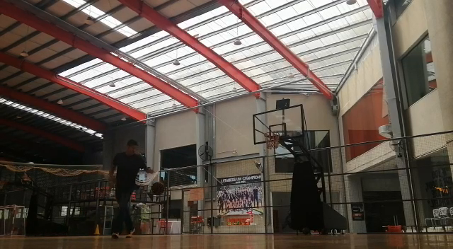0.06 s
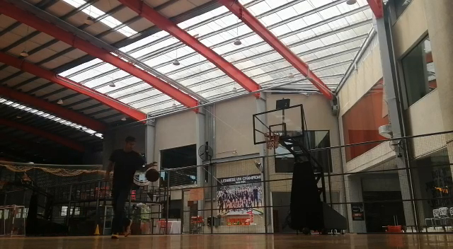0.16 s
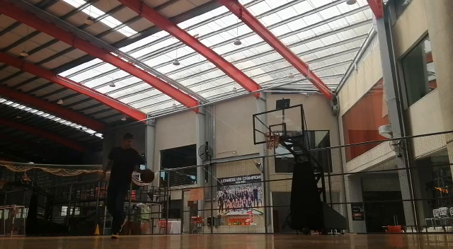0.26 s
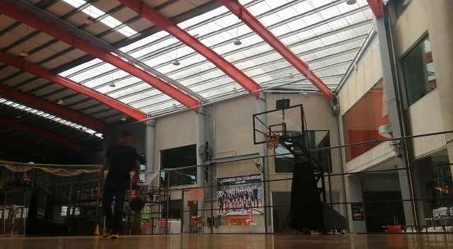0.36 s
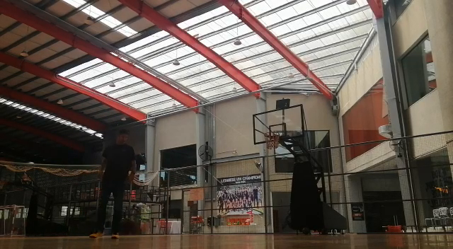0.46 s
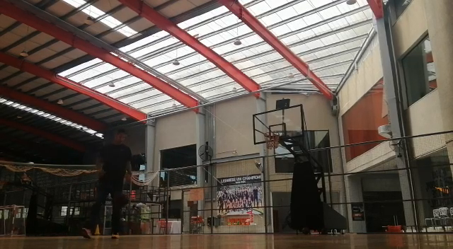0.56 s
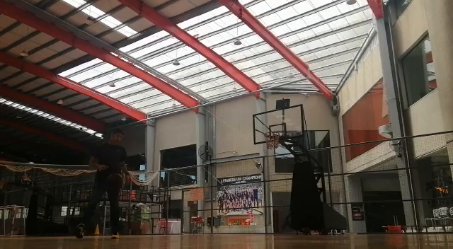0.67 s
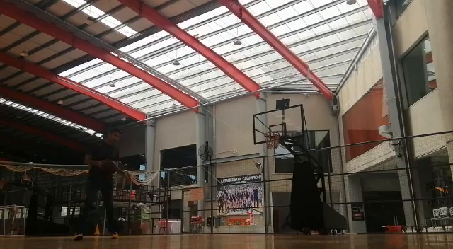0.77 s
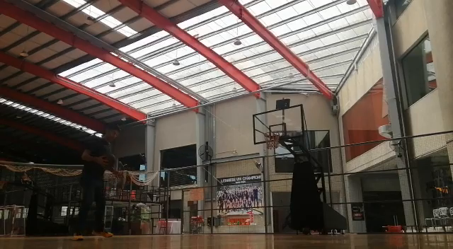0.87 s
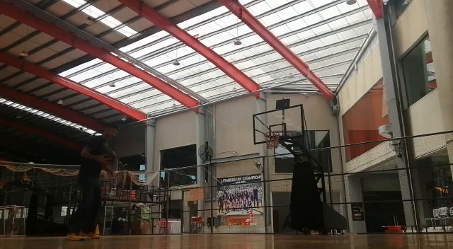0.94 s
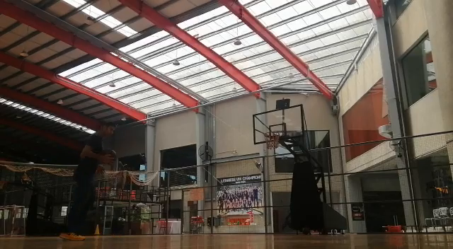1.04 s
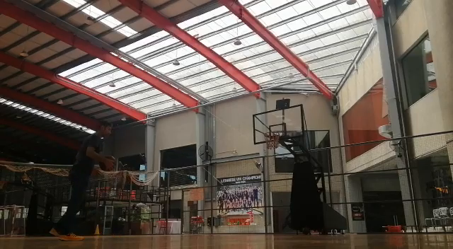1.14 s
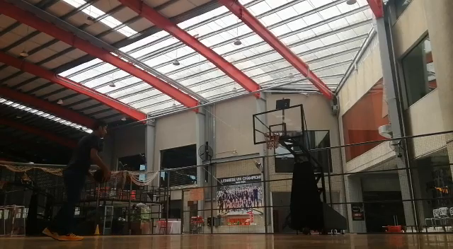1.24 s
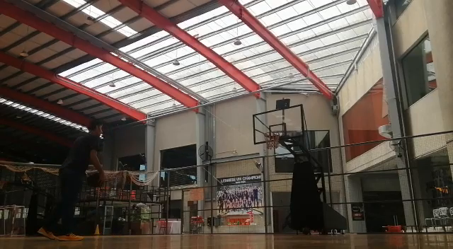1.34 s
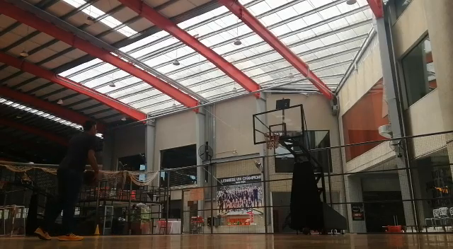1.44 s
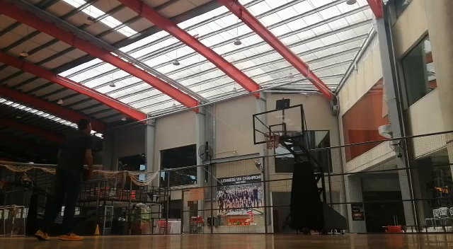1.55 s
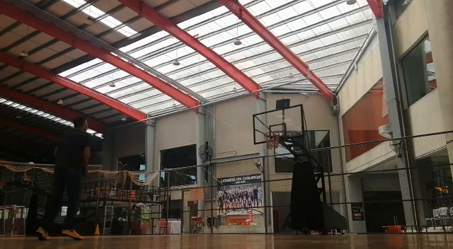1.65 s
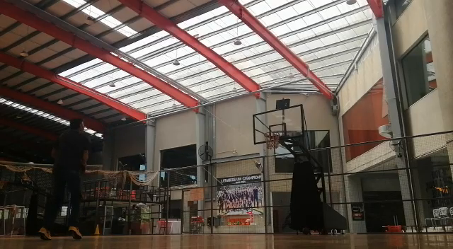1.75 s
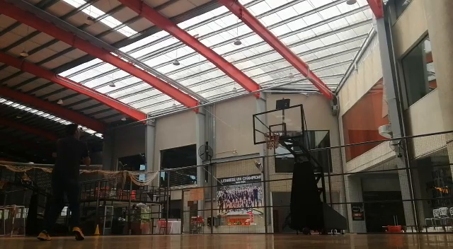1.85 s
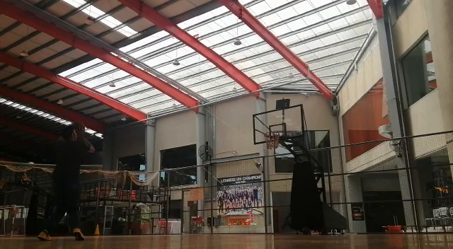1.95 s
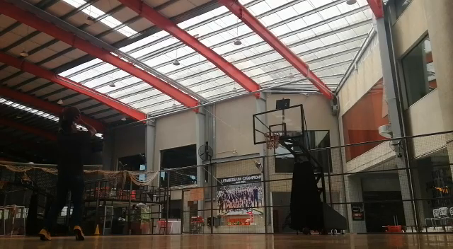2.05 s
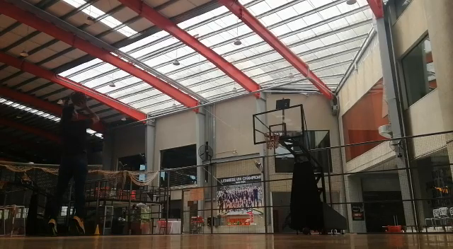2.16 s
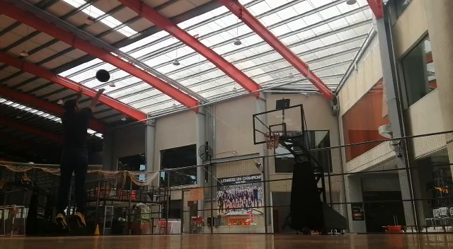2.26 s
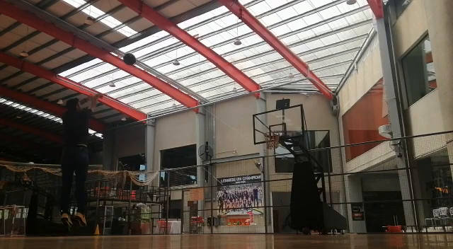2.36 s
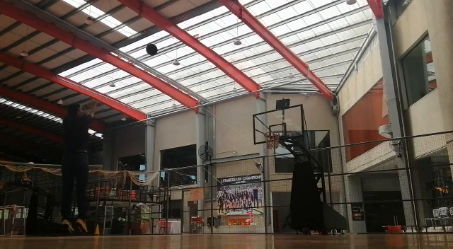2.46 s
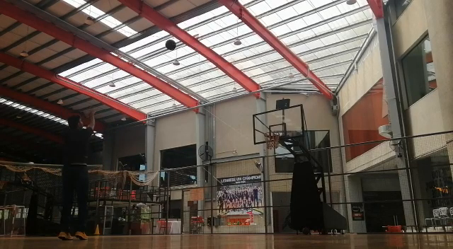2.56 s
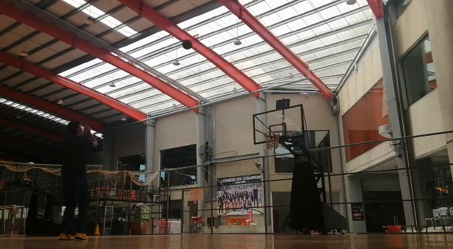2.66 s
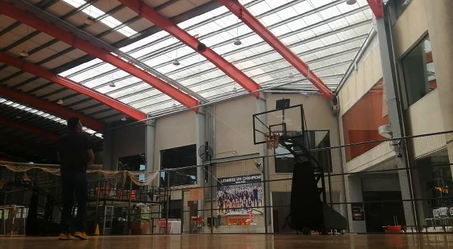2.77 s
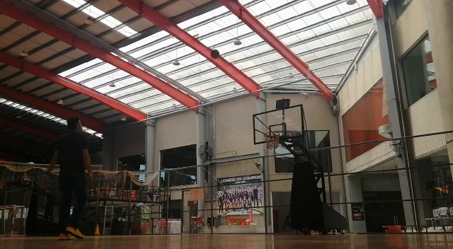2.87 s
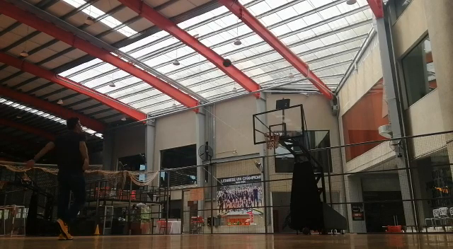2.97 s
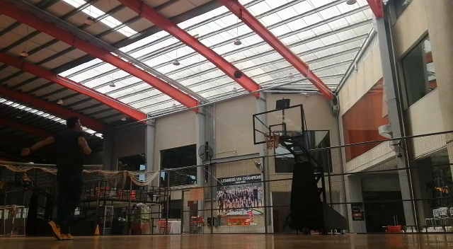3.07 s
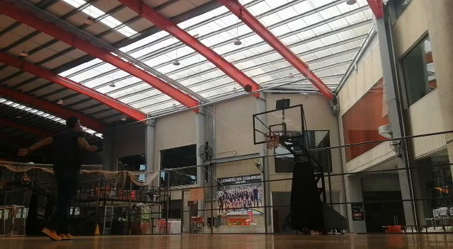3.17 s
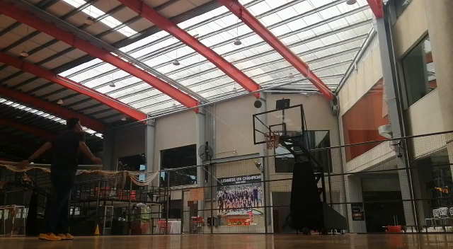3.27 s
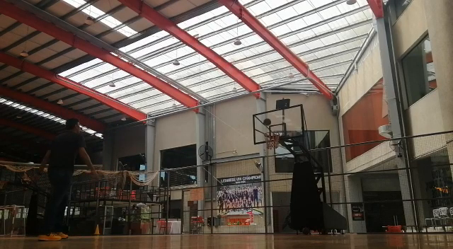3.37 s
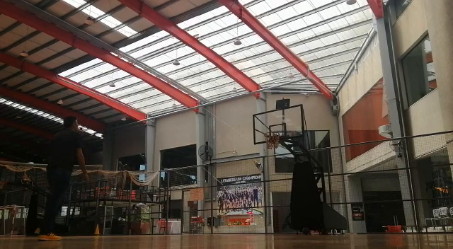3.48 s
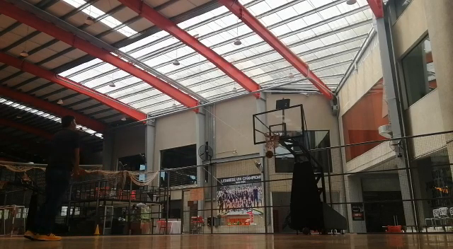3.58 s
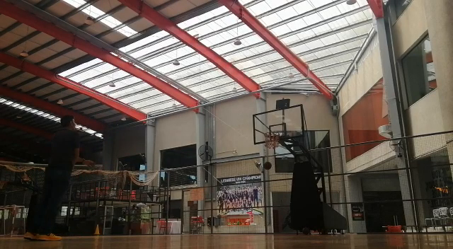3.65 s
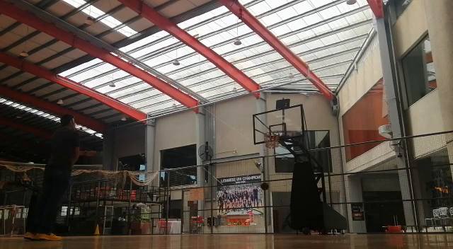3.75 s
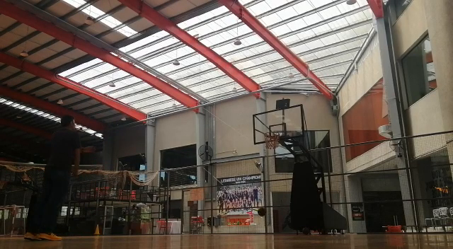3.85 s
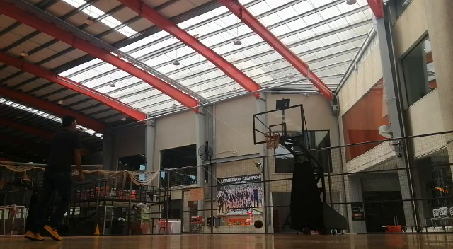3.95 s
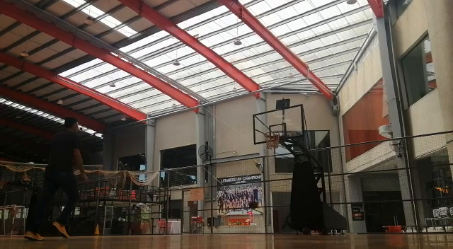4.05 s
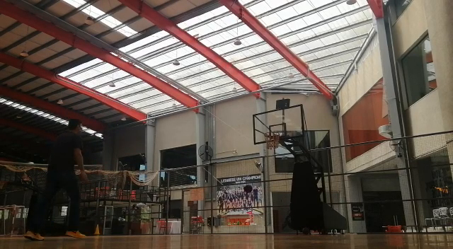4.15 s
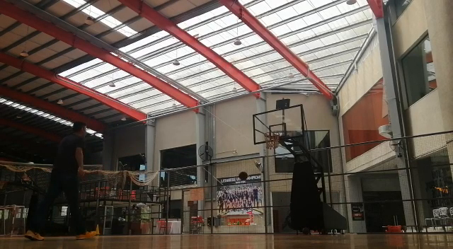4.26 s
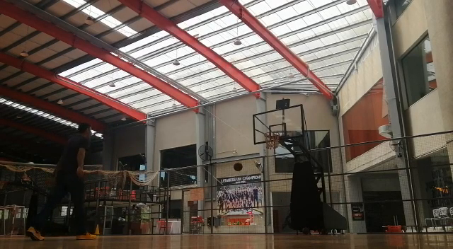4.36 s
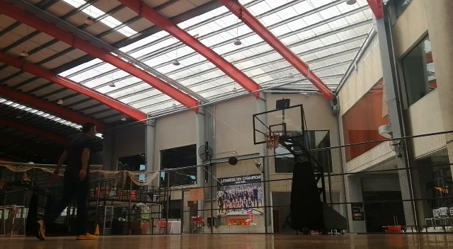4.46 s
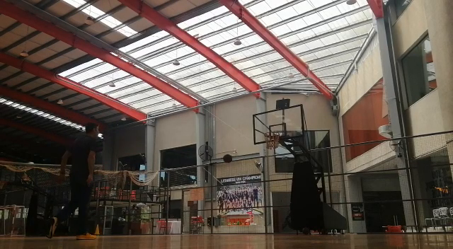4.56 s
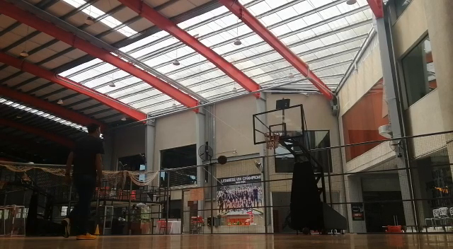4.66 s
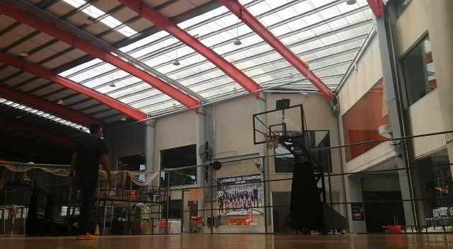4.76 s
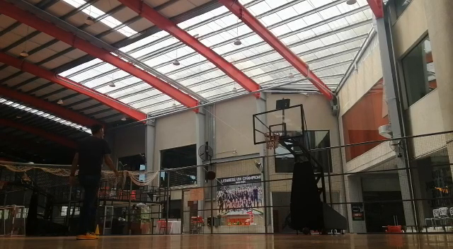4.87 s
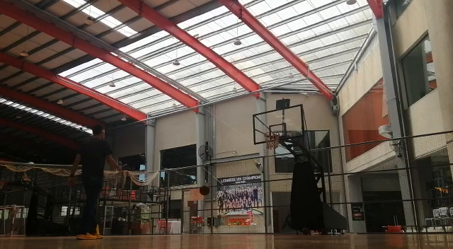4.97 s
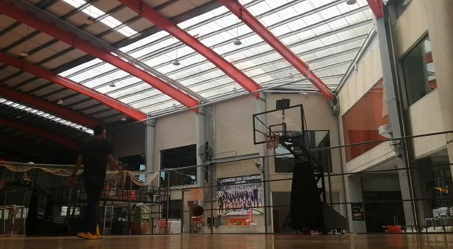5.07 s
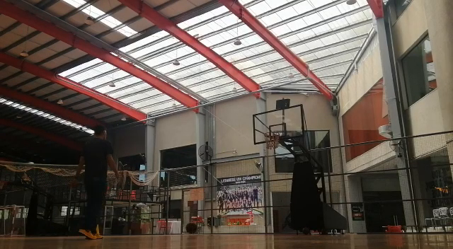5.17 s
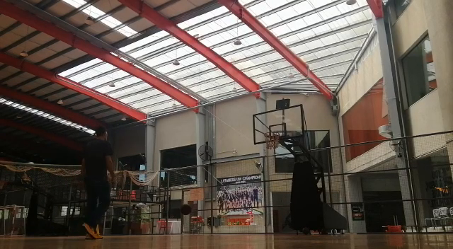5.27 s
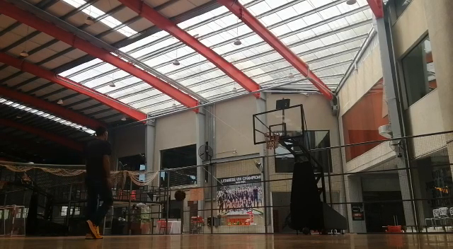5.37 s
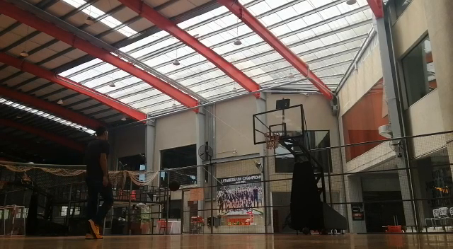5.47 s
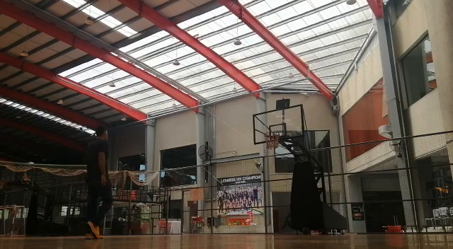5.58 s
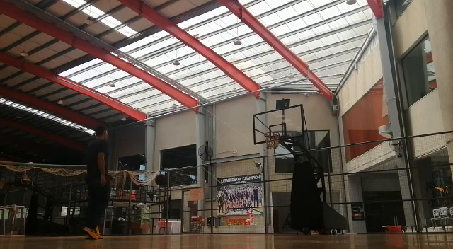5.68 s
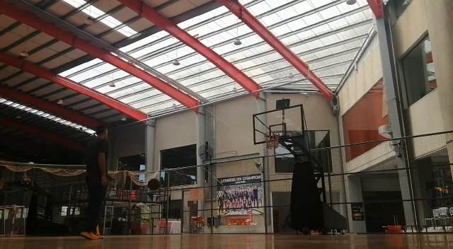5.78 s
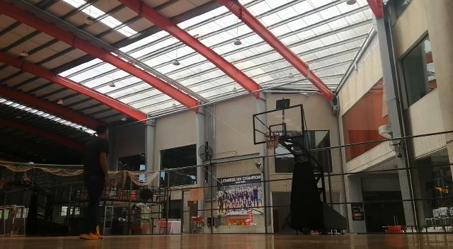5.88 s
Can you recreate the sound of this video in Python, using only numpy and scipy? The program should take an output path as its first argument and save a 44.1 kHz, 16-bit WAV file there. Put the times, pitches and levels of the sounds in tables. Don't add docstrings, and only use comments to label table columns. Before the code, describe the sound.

Two booming dribbles, a brief sole squeak and shuffling steps, then a ball clips hoop and net and bounces on in a reverberant gym.

```python
import sys
import numpy as np
from scipy import signal
from scipy.fft import rfft, irfft, next_fast_len
from scipy.io import wavfile
from scipy.ndimage import uniform_filter1d

SR = 44100
rng = np.random.default_rng(int(sys.argv[2]) if len(sys.argv) > 2 else 0)


def gain_from_db(level_db):
    decades = np.asarray(level_db, float) / 20
    return 10 ** decades


def waveform_to_disk(signal):
    frames = np.transpose(np.atleast_2d(signal))
    scaled = np.clip(frames, -1, 1) * 32767
    samples = np.round(scaled).astype(np.int16)
    wavfile.write(sys.argv[1], SR, samples)


N = 261072


def at_hz(points, hz, axis=1):
    points = np.array(points)
    return np.interp(np.log(np.maximum(hz, 1)), np.log(points[:, 0]), points[:, axis])


def add(track, s, sound):
    i = int(round(s * SR))
    track[i:i + len(sound)] += sound[:max(N - i, 0)]


def band(x, low_hz, high_hz):
    return signal.sosfilt(signal.butter(2, [low_hz, high_hz], "band", fs=SR, output="sos"), x)


def filtered(x, response):
    size = next_fast_len(N + 4096)
    hz = np.arange(size // 2 + 1) * SR / size
    return irfft(rfft(x, size) * response(hz), size)[:, :N]


def struck(modes, spread_db, size=8192):
    t = np.arange(size) / SR
    ringing = np.zeros(size)
    for hz, db, t60 in modes:
        level_db = db + spread_db * rng.standard_normal()
        ringing += gain_from_db(level_db - 60 * t / t60) * np.sin(2 * np.pi * hz * t)
    return ringing


def noise_bands(size):
    # f/Hz, likeness [0 to 1]
    likeness = [(60, 0.99), (200, 1), (500, 0.5), (1000, 0.061), (4000, 0.019), (12000, 0.05)]
    edges = 20 * 2 ** np.arange(0, 9.9, .5)
    white = rng.standard_normal((2, 2, size + 8192))
    for k, (low, high) in enumerate(zip(edges, edges[1:])):
        mid, side = band(white[k % 2], low, high)[:, 8192:]
        hz = np.sqrt(low * high)
        alike = np.clip(at_hz(likeness, hz), 0, 1)
        yield hz, (np.sqrt(1 + alike) * mid + np.sqrt(1 - alike) * side * [[1], [-1]]) / np.sqrt(2)


def rumble():
    # f/Hz, level/dB per Hz
    spectrum = [(25, -1), (40, -24), (62, -1), (82, -3), (120, -2), (200, -9), (310, -22.5), (500, -26.5),
                (1000, -27.5), (2000, -33), (4000, -41), (6300, -45.5), (9000, -59.5), (15000, -56.5)]
    # t/s, level/dB
    traffic = [(0.0, -32), (0.45, -48), (0.82, -37.5), (1.75, -44.5), (2.14, -42.5), (3.3, -45),
               (4.5, -37.5), (5.47, -41), (5.92, -38)]
    traffic_db = np.interp(np.arange(N) / SR, *np.transpose(traffic))
    swell_db = traffic_db - np.mean(traffic_db)
    out = 0
    for hz, noise in noise_bands(N):
        flicker_db = 1.2 * np.interp(np.arange(N), np.linspace(0, N, 40), rng.standard_normal(40))
        share = 1 / (1 + (hz / 260.0) ** 2)
        out = out + noise * gain_from_db(at_hz(spectrum, hz) + share * swell_db + flicker_db)
    return gain_from_db(-47) * out / np.std(out)


def lamp_whine():
    return gain_from_db(-103) * np.sin(2 * np.pi * 12930 * np.arange(N) / SR)


def hall(send):
    # f/Hz, level/dB, extra slope/dB per s, build-up/s
    colour = [(40, -13, 1.5, 0.022), (106.8, -1.5, 3.7, 0.025), (306, -1.5, -12.5, 0.054),
              (1080, -2.5, -3.5, 0.011), (3700, -5, 0, 0.087), (6100, -6, -14, 0.048),
              (10100, -3, -43, 0.2), (15500, -8, -59, .03)]
    t = np.arange(int(2.5 * SR)) / SR
    shape_db = -33.5 - 21.5 * t
    shape_db += 7 * np.exp(-t / 0.03)
    shape_db += 3 / (1 + np.exp((t - 0.49) / 0.032))
    shape_db -= 6.0 * np.exp(-((t - 0.046) / 0.01) ** 2)
    bunches = np.interp(t, np.linspace(0, t[-1], 300), rng.standard_normal(300))
    shape_db += 5.7 * bunches * np.exp(-t / 0.15)
    shape_db += 20 * np.log10(np.clip(t / .003, 1e-3, 1))
    tail = 0
    for hz, noise in noise_bands(len(t)):
        level_db, slope_db, build_s = (at_hz(colour, hz, axis=k) for k in (1, 2, 3))
        build_up = 1 - np.exp(-t / max(build_s, 1e-4))
        tail = tail + noise * gain_from_db(shape_db + level_db + slope_db * t) * build_up
    return signal.fftconvolve(send[None], tail)[:, :N]


def returns(distance_m):
    # across/m, further back/m, slap level/dB, boom level/dB, sustained level/dB
    images = [
        (13.82, 0, 1.5, 1, 4.5),
        (28, 0, -6, 7.5, 8),
        (0, 22.5, -17, -2, 0),
        (0, 41, -7, 7.5, 5.5),
        (0, 86.5, -10, 4, 0),
        (0, 114, -34, 7, 4.5),
    ]
    for across_m, back_m, *part_db in images:
        path_m = np.hypot(distance_m + back_m, across_m)
        delay_s = (path_m - distance_m) / 343
        yield delay_s, np.array(part_db) + 20 * np.log10(distance_m / path_m)


def step(scuff_db, low_hz, high_hz, thud_db, t60):
    t = np.arange(8192) / SR
    gain = gain_from_db(scuff_db + 7.0) * np.sqrt(SR / 2 / (high_hz - low_hz))
    grit = rng.standard_normal(8192) * gain_from_db(-60 * t / t60) * (1 - np.exp(-t / 0.0013))
    thud = gain_from_db(thud_db) * np.sin(2 * np.pi * 69.3 * t) * gain_from_db(-60 * t / 0.21) * (1 - np.exp(-t / 0.013))
    knock = (t == 0) * np.sqrt(np.sum(grit ** 2))
    scuff = band(band(grit, low_hz, high_hz), low_hz, high_hz)
    return gain * scuff + thud, gain * band(knock, low_hz, high_hz) + thud


def sole(scuff_db, bright_db, thud_db, t60):
    # low f/Hz, high f/Hz, share of the brightness, level/dB
    sole_parts = [
        (297, 577, 0.029, -1),
        (676, 1720, 0.12, -3),
        (1880, 5770, 0.94, -0.5),
        (6500, 12000, 0.8, -13),
    ]
    part_thud_db = thud_db - 20 * np.log10(len(sole_parts))
    parts = []
    for low_hz, high_hz, share, part_db in sole_parts:
        part_scuff_db = scuff_db + share * bright_db + part_db
        parts.append(step(part_scuff_db, low_hz, high_hz, part_thud_db, t60 / 1.52 ** share))
    return np.sum(parts, axis=0)


def squeak():
    # t/s, hold/s, f/Hz, level/dB, overtone level/dB
    slips = [
        (1.058, 0.01, 4147, -38, -33.5),
        (1.117, 0.035, 4346, -32.5, 7.5),
        (1.466, .006, 5630, -62, -27),
    ]
    # multiple of the pitch, level/dB
    orders = [
        (2, -21.5),
        (3, -40),
    ]
    attack_s, release_db_per_s, sag_hz_per_s, overtone_fade_db_per_s = .012, 1803, 2500, 298
    firm_slip_db, light_chatter = -33, .4
    wobble = uniform_filter1d(rng.standard_normal(N), size=150) * 0.018
    t = np.arange(4096) / SR
    out = np.zeros(N)
    for s, hold_s, hz, db, over_db in slips:
        chatter = wobble[int(s * SR):][:4096] * gain_from_db(light_chatter * (firm_slip_db - db))
        phase = 2 * np.pi * np.cumsum((hz - sag_hz_per_s * t) * (1 + chatter)) / SR
        release_db = release_db_per_s * np.maximum(t - attack_s - hold_s, 0)
        level = np.minimum(t / attack_s, 1) ** 2 * gain_from_db(db - release_db) * np.sqrt(2)
        overtones = sum(gain_from_db(order_db) * np.sin(k * phase) for k, order_db in orders)
        add(out, s, level * (np.sin(phase) + gain_from_db(over_db - overtone_fade_db_per_s * t) * overtones))
    return out


def net():
    t = np.arange(16384) / SR
    unevenness = uniform_filter1d(rng.standard_normal(len(t)), size=100) * 10
    clatter = rng.standard_normal(len(t)) * gain_from_db(6.8 * unevenness)
    return gain_from_db(-44.0 - 60 * t / 0.77) * band(clatter, 1200, 8000)


def rim(db):
    # f/Hz, level/dB, t60/s
    hoop_modes = [(169.7, -7.5, 0.16), (246, -12.5, 0.073), (410, -0.5, 0.12), (553, -14, 0.038),
                  (1130, -4, 0.011), (1364, -24.5, 0.11), (1810, -3, 0.0057), (2800, -24, 0.037)]
    # low f/Hz, high f/Hz, level/dB
    crash_bands = [
        (57.6, 424, 42),
        (322, 1340, 33.5),
        (1710, 2560, 18.5),
        (4000, 11300, 21),
        (9900, 20600, 17.5),
    ]
    t = np.arange(600) / SR
    rattle = rng.standard_normal(600) * (t / 0.0031) * np.exp(1 - t / 0.0028)
    ring = struck(hoop_modes, spread_db=3.0)
    contact = band(np.pad(rattle, (0, 7592)), 630, 3200)
    near = np.convolve(ring, rattle * gain_from_db(-14.0))[:8192] + gain_from_db(-1.0) * contact
    click = np.arange(8192) == 0
    crash = sum(gain_from_db(part_db) * band(click, low_hz, high_hz) for low_hz, high_hz, part_db in crash_bands)
    return gain_from_db(db) * near, gain_from_db(db) * (crash + gain_from_db(-4.5) * ring)


def echo(slap_db, thump_db, ring_db, bright_hz):
    t = np.arange(8192) / SR
    scatter = rng.standard_normal(400) * gain_from_db(-23.0 - 60 * t[:400] / 0.027)
    scatter[20] = 1
    direct, _ = bounce(slap_db, -99, ring_db, bright_hz)
    slap = np.convolve(direct, scatter)[20:8212]
    boom = np.sin(2 * np.pi * 142.0 * (t - .0032)) * (t / 0.0068) * np.exp(1 - t / 0.0047)
    return slap + gain_from_db(thump_db) * boom


def bounce(slap_db, thump_db, ring_db, bright_hz):
    # f/Hz, level/dB, t60/s
    air_modes = [(479, -10, 0.032), (1266, -9, 0.036), (1433, -5, 0.0088), (1886, -9.5, 0.0065),
                 (2160, -18.5, 0.021), (3070, -16.5, 0.005), (4300, -36, 0.0073), (5790, -28.5, 0.025)]
    # f/Hz, level/dB, t60/s
    board_modes = [(112, 0, .042), (235, -8, .04), (500, -17, .03)]
    t = np.arange(8192) / SR
    click = (t == 0) * -SR / bright_hz / 3
    shock = click + .2 * np.roll(click, 30) - .3 * np.roll(click, 120)
    shock -= 0.039 * click[0] * rng.standard_normal(8192) * gain_from_db(-60 * t / 0.048)
    boards = np.roll(struck(board_modes, spread_db=3.0), 62)
    boards[:62] = -.5 * np.sin(np.pi * np.arange(62) / 62)
    body = gain_from_db(thump_db) * boards
    air = gain_from_db(ring_db) * band(struck(air_modes, spread_db=8.5), 390, 1.25 * bright_hz)
    near = gain_from_db(slap_db) * band(shock, 230, 0.76 * bright_hz) + body - air
    all_round = gain_from_db(slap_db) * band(click, 630, bright_hz) + gain_from_db(-4.0) * body - gain_from_db(2.0) * air
    return near, all_round


def scene():
    # t/s, slap level/dB, thump level/dB, inner air ring level/dB, distance/m
    bounces = [
        (.0046, -5.5, -16, -18, 11.26),
        (0.5935, -6, -16.5, -33.5, 11.5),
        (4.0857, -1.5, -17.5, -41.5, 16.9),
        (5.311, -6, -22.5, -31, 14),
    ]
    # t/s, level/dB, hall send level/dB
    rim_hits = [
        (3.612, -27.5, 2),
        (3.627, -31, -51.5),
    ]
    # t/s after the hit, level/dB
    rim_booms = [
        (0.055, -16),
        (.105, -24),
    ]
    # t/s, scuff level/dB, brightness/dB, thud level/dB, scuff t60/s
    steps = [(.359, -45, -8, -41, 0.064), (.925, -55, 0, -47, 0.064), (1.404, -47, -0.5, -32, 0.079),
             (1.848, -80, 15, -57, 0.04), (1.908, -52.5, -5.5, -30.5, 0.064), (2.131, -85, 10, -37, 0.56),
             (2.211, -74, 1, -30, .05), (2.265, -69, 10, -42, 0.061), (2.513, -68, -24, -38, 0.024),
             (2.662, -48, -13.5, -40, 0.17), (2.682, -64.5, -2.5, -38, 0.78), (3.373, -68, -21, -26.5, .02),
             (4.837, -78, 2, -37, 0.2), (4.929, -54.5, -8, -37, .025)]
    # f/Hz, level/dB
    mic_response = [(22, -4), (50, 3.5), (6000, -5.5), (8000, -8.5), (12000, -14.5), (15000, -24.5),
                    (15600, -37)]
    player_m, hall_radius_m = 10, 10.25
    slip, shoes, echoes = squeak(), np.zeros(N), np.zeros(N)
    near, send = slip.copy(), slip * gain_from_db(-3.5)

    blows = [(s, rim(db), send_db) for s, db, send_db in rim_hits]
    for s, slap_db, thump_db, ring_db, distance_m in bounces:
        send_db = 20 * np.log10(distance_m / hall_radius_m)
        blows.append((s, bounce(slap_db, thump_db, ring_db, 5200), send_db))
        for later_s, (sharp_db, boom_db, held_db) in returns(distance_m):
            returned = echo(slap_db + sharp_db, thump_db + boom_db, ring_db + held_db, 4540)
            add(echoes, s + later_s, returned)
    for s, (direct, all_round), send_db in blows:
        add(near, s, direct)
        add(send, s, all_round * gain_from_db(send_db))

    for s, *touch in steps:
        direct, all_round = sole(*touch)
        add(shoes, s, direct)
        add(send, s, all_round * gain_from_db(-1.5))
    for later_s, (_, _, held_db) in returns(player_m):
        add(echoes, later_s, gain_from_db(held_db) * (slip + gain_from_db(-0.5) * band(shoes, 250, 5000)))

    rim_s = rim_hits[0][0]
    add(echoes, rim_s, net())
    for later_s, db in rim_booms:
        add(echoes, rim_s + later_s, echo(db - 24, db, db - 12, 3000))
    echoes = np.array([gain_from_db(-8) * np.roll(echoes, int(0.00036 * SR)), echoes])
    sound = near + shoes + echoes + hall(send) + rumble()
    return filtered(sound, lambda hz: gain_from_db(at_hz(mic_response, hz))) + lamp_whine()


def ports(hz):
    # f/Hz, left minus right level/dB
    balance = [(30, -5.5), (150, -5.5), (2000, -3), (5000, -5.5), (8000, -6.5), (12000, 31.5)]
    # f/Hz, lag/s
    left_lag = [(100, -.0002), (350, -.00005), (1000, .00001)]
    half_db = at_hz(balance, hz) / 2
    half_lag = np.exp(-1j * np.pi * hz * at_hz(left_lag, hz))
    return np.array([gain_from_db(half_db) * half_lag, gain_from_db(-half_db) / half_lag])


def low_pass(x):
    return signal.sosfilt(signal.butter(12, 16470, fs=SR, output="sos"), x)


def record(dry):
    mix = filtered(dry, ports)
    return low_pass(mix)


dry = scene()
out = record(dry)
waveform_to_disk(out)
```